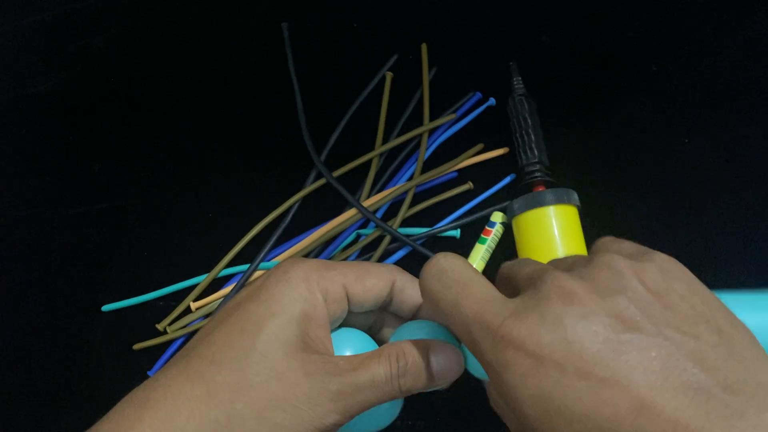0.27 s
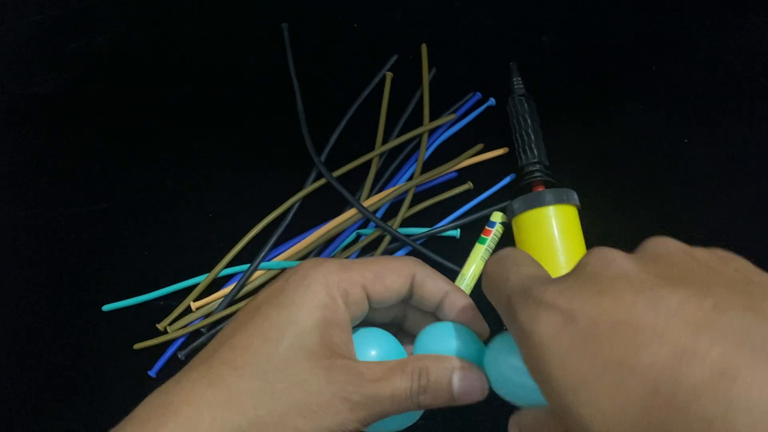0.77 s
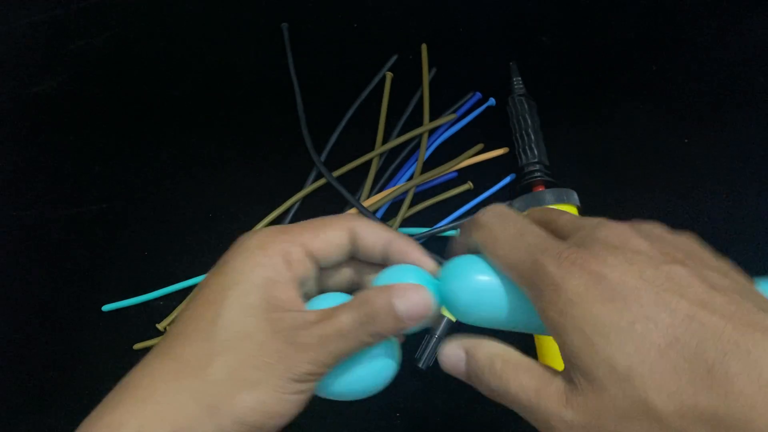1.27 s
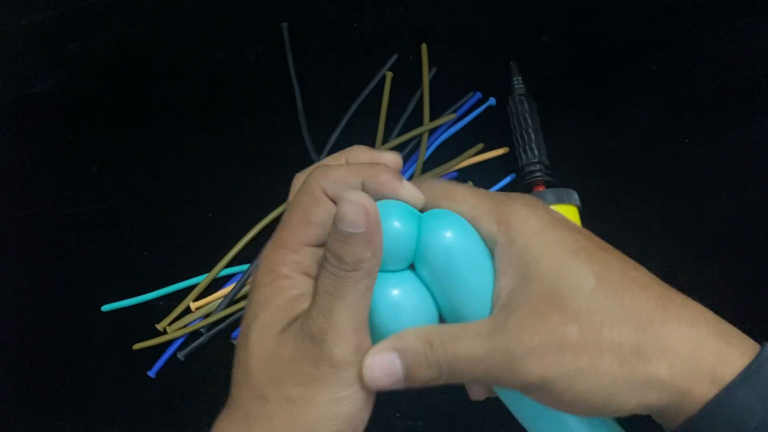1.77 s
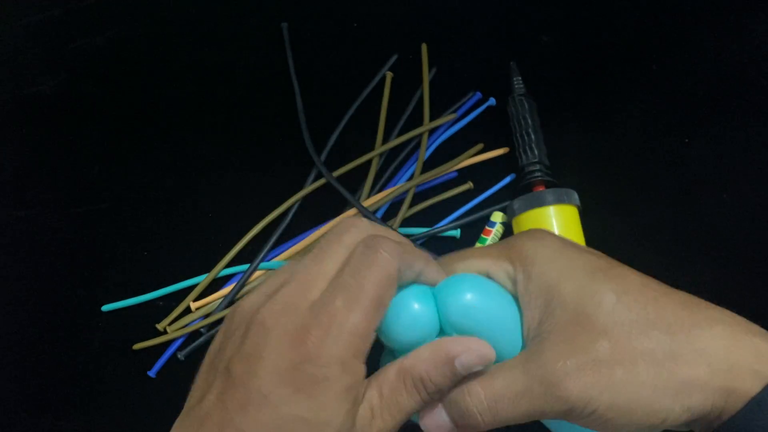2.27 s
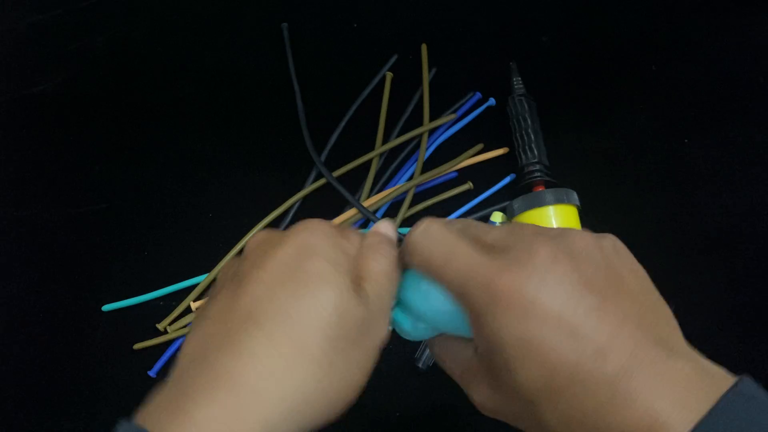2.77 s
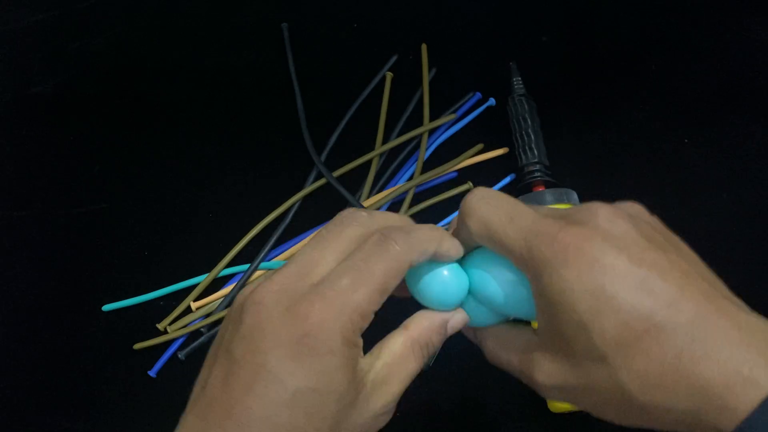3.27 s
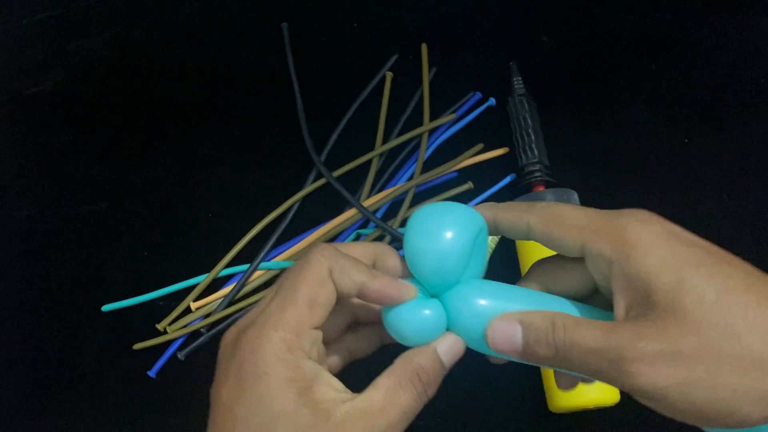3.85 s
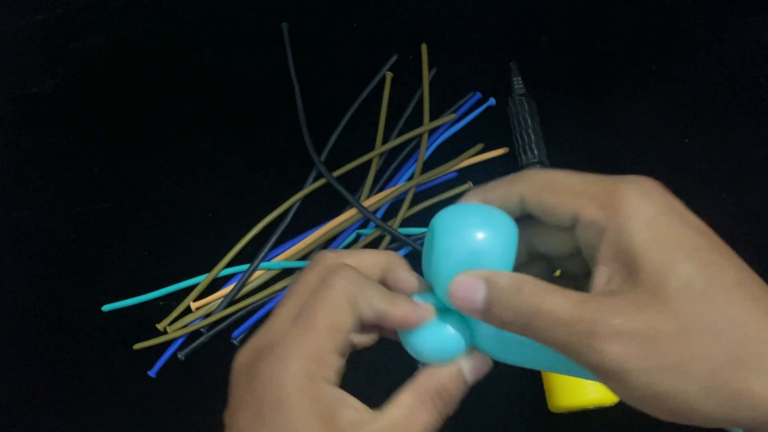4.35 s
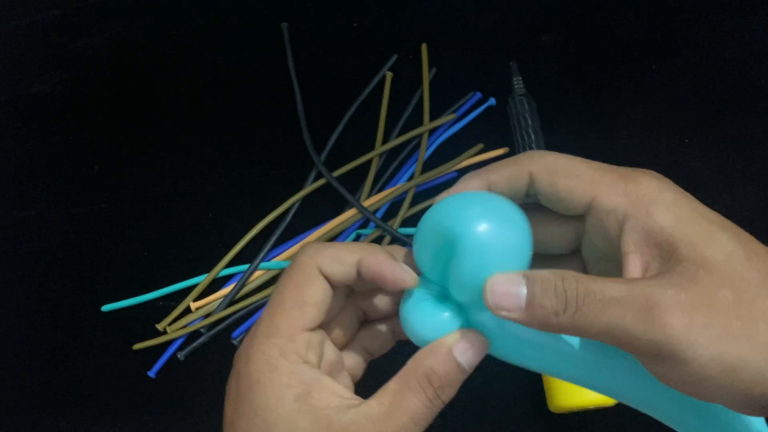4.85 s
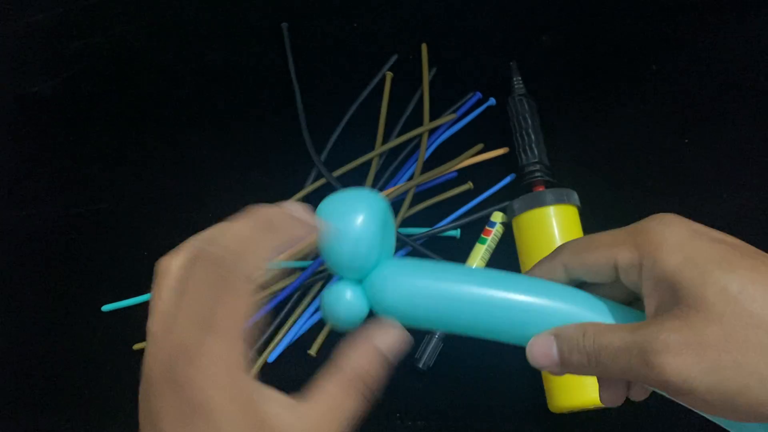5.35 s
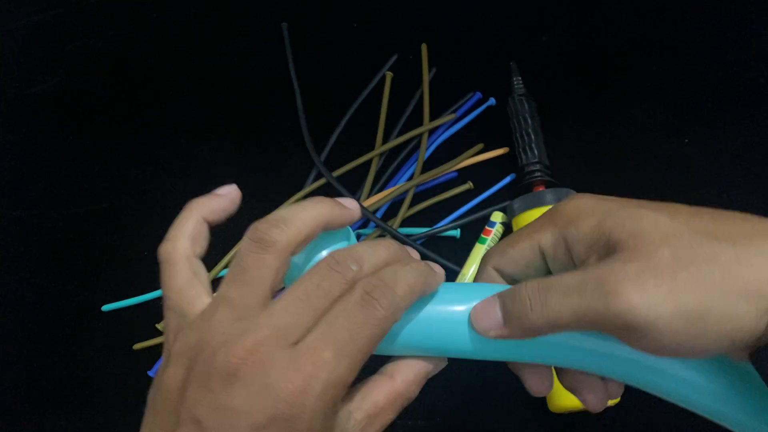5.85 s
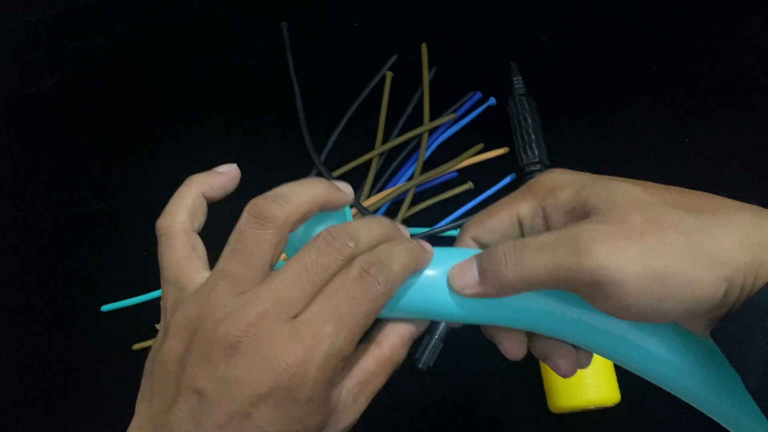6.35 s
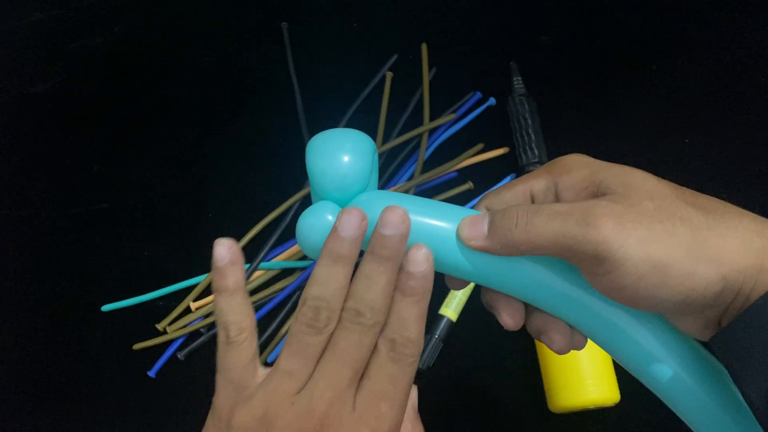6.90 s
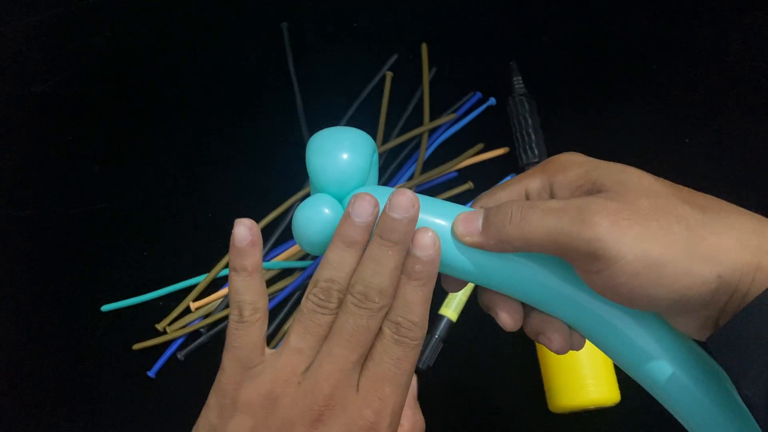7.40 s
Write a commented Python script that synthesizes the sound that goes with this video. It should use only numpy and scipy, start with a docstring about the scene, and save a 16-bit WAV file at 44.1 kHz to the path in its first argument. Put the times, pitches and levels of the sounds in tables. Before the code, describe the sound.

Fingers rustle on a long inflated latex balloon, which creaks softly at first. The rubber then sticks and slips harder as it is twisted and folded, giving uneven spells of sharp squeaky snaps, with hollow bloops, small plops and soft thuds in between. The handling fades near the end, leaving one last slip and plop. The sound is close to the microphone, in a small room with a faint low hum.

```python
"""Hands twist and fold a long latex balloon near a two-port microphone, over a small room's air and hum.
First, fingers rustle on the latex and it creaks softly. From 0.9 s the rubber sticks and slips harder:
each slip cracks, rings the skin and sends a falling wave along the tube, the loudest at 2.4 s.
Tube bloops, bubble plops, hand swishes and soft thuds come in between. After 6.4 s the handling
fades; a last slip and plop sound at 7.5 s."""
import sys
import numpy as np
from scipy import signal
from scipy.fft import rfft, irfft
from scipy.io import wavfile
from scipy.ndimage import uniform_filter1d

SR = 44100
rng = np.random.default_rng(int(sys.argv[2]) if len(sys.argv) > 2 else 0)


def unload_wav(signal):
    """Save mono or channel-first audio to the path in sys.argv[1] as 16-bit WAV at rate SR, clipped to [-1, 1]."""
    wavfile.write(
        sys.argv[1],
        SR,
        np.round(np.clip(np.atleast_2d(signal).T, -1, 1) * 32767).astype(np.int16),
    )


N = 336483

# Room air spectrum. Each row: frequency in Hz, relative density in dB.
AIR_SPECTRUM = [(18, -30.5), (30, -2.5), (54, -12), (65, -17), (123, -22), (196, -27.5), (288, -29),
                (413, -32.5), (1530, -56.5), (14000, -91.5)]
# Hum lines. Each row: frequency in Hz, rms level in dB, wander in Hz.
HUM_LINES = [(43.2, -54, 2.3), (71.4, -61.5, 2.9), (301, -73.5, 18)]
# Room decay. Each row: frequency in Hz, T60 in seconds.
ROOM_DECAY = [(200, 0.45), (1000, 0.036), (4000, 0.17), (12000, 0.079)]
# Room tail colour. Each row: frequency in Hz, relative gain in dB.
ROOM_SPECTRUM = [(200, -6), (1000, 2.5), (3000, -2), (10000, -6)]
# Port colour difference. Each row: frequency in Hz, left minus right in dB.
PORT_BALANCE = [(250, 1.5), (600, 3.5), (1500, 1), (3000, -2.5), (8000, -1)]
# Soft hand thuds. Each row: start in seconds, level in dB, centre in Hz, length in seconds.
HAND_THUDS = [(1.64, -42, 170, .035), (4.53, -46, 200, .05), (5.47, -50, 260, .06), (6.59, -50, 290, .07)]
# Hand strokes; narrow ones squeak. Each row: start and length in seconds, level in dB, band edges in Hz.
HAND_STROKES = [(0.767, 0.02, -48, 1500, 7000), (0.812, 0.13, -50, 1050, 1330),
                (1.51, 0.096, -46.5, 4006, 9200), (2.341, 0.022, -43.5, 1003, 9050),
                (2.588, 0.061, -49, 1070, 1272), (2.902, 0.024, -46, 1200, 5960),
                (4.348, 0.092, -53, 2080, 2904), (4.853, 0.44, -51.5, 3990, 11050),
                (6.137, 0.047, -53.5, 2000, 9080), (6.459, 0.34, -65, 4517, 12350),
                (6.995, 0.11, -69, 1978, 10100)]
# Steady finger sliding. Each row: time in seconds, level in dB.
SLIDE_LEVELS = [(0.0, -52.5), (0.108, -68.5), (0.148, -50), (0.34, -58), (0.36, -46), (0.51, -52),
                (0.54, -56.5), (0.81, -50), (1.2, -48), (1.311, -57.5), (1.36, -45), (1.6, -50),
                (1.94, -60.5), (2.211, -61), (2.34, -56.5), (2.901, -50), (3.168, -66), (3.299, -66),
                (3.5, -54.5), (3.9, -54.5), (4.49, -53.5), (4.55, -57.5), (5.201, -51.5), (5.42, -57),
                (5.501, -72.5), (5.7, -47.5), (5.932, -71), (6.1, -52), (6.391, -66), (6.55, -63.5),
                (6.7, -79), (6.94, -73.5), (7.3, -88), (7.63, -76.5)]
# Finger hiss spectrum. Each row: frequency in Hz, relative density in dB.
RUSTLE_SPECTRUM = [(300, 5), (1000, -4), (2300, -1.5), (4000, -1.5), (6500, -7.5), (10000, -8.5),
                   (12000, -13), (13500, -36)]
# Modes of the stretched skin. Each row: frequency in Hz, relative level in dB, T60 in seconds.
SKIN_MODES = [(1126, -9.5, 0.016), (1570, -7.5, 0.0039), (1950, -7.5, 0.022), (2681, -7.5, 0.018),
              (4372, 6.5, 0.0047)]
# Hollow tube waves. Each row: start in seconds, level in dB, end pitch in Hz, decay in cycles.
TUBE_BLOOPS = [(0.049, -39.5, 119, 0.67), (1.354, -41.5, 168, 2.1), (1.562, -38, 293, 3.9),
               (1.576, -35.5, 120, 1.2), (1.621, -26, 273.5, 1.9), (1.697, -37.5, 164, 1.8),
               (1.975, -26.5, 428, 1.7), (2.362, -29, 182.7, 0.98), (2.709, -37.5, 135, 1.9),
               (2.75, -36.5, 142.5, 1.48), (3.572, -27.5, 394, 6.8), (3.586, -21.5, 292, 1.15),
               (3.592, -33, 149.9, 1.5), (3.756, -39, 299, 1.9), (4.132, -29, 313.7, 2.8),
               (4.175, -32.5, 278, 3), (5.266, -33, 198, 3.8), (6.226, -37.5, 321, 1)]
# Twisted-off bubble. Each row: start in seconds, level in dB, pitch in Hz, decay in cycles.
BUBBLE_PLOPS = [(.648, -40, 714, 8.1), (.678, -28, 730, 3.3), (1.019, -29.5, 764, 4.4),
                (1.878, -15.5, 925, 0.78), (5.016, -20, 798, 1.82), (5.067, -31.5, 644, 2.8),
                (5.072, -25.5, 675, 1.7), (6.295, -26, 1047, 1.9), (6.429, -20, 999, 1.7),
                (7.493, -26.5, 1106, 2.6)]
# Runs of slips. Each row: start and end in seconds, first and last rate in slips per second,
# body peak in dB, main ring in Hz, crack in dB over the body peak.
CREAK_RUNS = [(0.13, .175, 76.4, 63, -37.5, 2300, -3), (0.35, .376, 290, 110, -24.5, 1600, -5),
              (.39, .4, 111, 132, -34, 2720, 3), (.412, .442, 220, 140, -33, 4050, -4.5),
              (.4725, .51, 137, 140, -30.5, 3936, -4), (.491, .512, 48.4, 56, -34, 1950, -13),
              (.9302, 0.955, 197, 205, -20, 1140, -9), (1.055, 1.074, 177, 170, -28, 1050, -20),
              (1.376, 1.388, 92, 100, -25.5, 3950, -13), (2.12, 2.136, 486, 450, -37, 3300, -16),
              (2.9445, 2.984, 98, 175, -24.5, 2070, 4), (3.9366, 3.969, 183, 200, -25, 2720, -7),
              (4.39, 4.411, 112, 128, -31.5, 2230, -0.5)]
# Single slips. Each row: start in seconds, body peak in dB, main ring in Hz, crack in dB over that peak.
SINGLE_SLIPS = [(0.026, -34.5, 2540, 10.5), (0.563, -36.5, 4500, 0), (0.5809, -27, 960, -8),
                (0.6799, -32.5, 1970, -6), (0.7317, -34, 1120, -19), (0.8933, -15.5, 1200, -6.5),
                (1.002, -29, 2497, -18), (1.0154, -17.5, 880, -20), (1.0598, -26, 1510, -20),
                (1.0812, -30, 767, -18), (1.1414, -29, 1826, -10), (1.2692, -27, 865, -11),
                (1.3435, -22, 2460, -10), (1.3983, -20, 1540, -15), (1.4151, -27.5, 3690, -2),
                (1.4331, -8, 2590, -10), (1.5605, -24.5, 728, -25), (1.571, -26, 880, -18),
                (1.577, -30, 484, -32), (1.6207, -25, 716, -21), (1.6397, -20.5, 977, -12),
                (1.6878, -32.5, 896, -20), (1.6968, -29, 754, -12), (1.8162, -35.5, 560, -25),
                (1.843, -36, 600, -3), (1.8773, -20.5, 854, -31), (1.9406, -20.5, 870, -5.5),
                (1.9643, -19, 765, -33), (1.9734, -9, 541, -40), (2.3622, -21.5, 553, -12),
                (2.3974, -2.5, 1014, -3), (2.4711, -28.5, 1050, -15), (2.55, -39, 1580, -26.5),
                (2.6102, -25.5, 1187, -5), (2.709, -33, 560, -17), (2.799, -20, 3840, -5),
                (2.8118, -24.5, 3564, -26), (3.002, -26, 2000, -17), (3.0117, -13, 2274, -7),
                (3.0235, -8, 2035, -3), (3.0272, -8.5, 1760, -27), (3.0288, -14, 1290, -25),
                (3.2109, -24.5, 3800, -7.5), (3.3103, -38, 1920, -6), (3.398, -39.5, 765, -29),
                (3.427, -44.5, 4500, 7), (3.4416, -36, 1450, -7), (3.5509, -31, 620, -13),
                (3.5648, -17.5, 1560, -24), (3.5705, -14, 2590, -6.5), (3.5735, -14, 654, -27),
                (3.5869, -6.5, 2560, -7.5), (3.8389, -30.5, 876, -17), (3.9184, -17, 2280, -13),
                (4.0225, -6.5, 3780, -1.5), (4.0595, -22, 2280, -4), (4.0705, -18, 2040, -21),
                (4.0795, -28, 1520, -7), (4.0831, -9, 930, -20), (4.0929, -29, 2000, 8),
                (4.1313, -13, 2080, -9), (4.1741, -32, 557, -15), (4.5135, -28, 2210, -34),
                (4.5226, -29.5, 2220, -3.5), (4.6763, -12, 1515, -12), (4.6846, -21.5, 2470, -6),
                (4.73, -22.5, 2110, -14), (4.7977, -15.5, 2220, -1.5), (4.9436, -15, 1850, -14),
                (5.0153, -12, 1940, -1), (5.2459, -24, 1760, 2), (5.2649, -18.5, 1190, -2.5),
                (5.3372, -26.5, 2100, -4.5), (5.3652, -26, 2210, -2.5), (5.4146, -29.5, 2300, -7.5),
                (5.5681, -32, 630, -41.5), (5.6031, -31.5, 2030, -4), (5.6234, -28.5, 1140, -19),
                (5.6569, -9.5, 1444, -6.5), (5.8597, -28.5, 983, -11), (5.9525, -35.5, 2150, -20),
                (6.0073, -29.5, 3390, -16), (6.0265, -19, 2240, -2), (6.0372, -14.5, 2260, -38),
                (6.0792, -21.5, 3020, -11), (6.0939, -28.5, 1200, -0.5), (6.1429, -32, 1960, -11),
                (6.2941, -14.5, 980, -9.5), (6.4287, -17.5, 1024, -15.5), (7.0404, -38.5, 955, -0.5),
                (7.4837, -35.5, 2667, -18.5), (7.4925, -23, 1021, -19)]


def undb(db):
    """dB to amplitude."""
    return 10 ** (np.asarray(db) / 20)


def unit(x):
    """Scale to rms 1."""
    return x / np.sqrt(np.mean(x ** 2))


def peak(x):
    """Scale each row to peak 1."""
    return x / np.abs(x).max(axis=-1, keepdims=True)


def columns(table):
    """Split into column vectors."""
    return np.transpose(table)[:, :, None]


def on_log(table, hz):
    """Read a (Hz, value) table on a log-frequency axis."""
    points_hz, values = np.transpose(table)
    return np.interp(np.log(np.maximum(hz, 1)), np.log(points_hz), values)


def coloured(x, table):
    """Filter by (Hz, dB) points."""
    n = x.shape[-1]
    return irfft(rfft(x) * undb(on_log(table, np.arange(n // 2 + 1) * SR / n)), n)


def bandpass(x, low_hz, high_hz):
    """Butterworth band-pass."""
    return signal.sosfilt(signal.butter(2, [low_hz, high_hz], "band", fs=SR, output="sos"), x)


def highpass(x, hz, order=2):
    """Butterworth high-pass."""
    return signal.sosfilt(signal.butter(order, hz, "high", fs=SR, output="sos"), x)


def walk(rate_hz):
    """Random steps, smoothed twice; rms 1."""
    hold = int(SR / rate_hz)
    steps = np.repeat(rng.standard_normal(N // hold + 1), hold)
    return unit(uniform_filter1d(uniform_filter1d(steps, hold), hold)[:N])


def sine(hz):
    """Sine following a pitch track."""
    return np.sin(2 * np.pi * np.cumsum(hz) / SR)


def place(rows, starts_s):
    """Sum short sounds at their start times."""
    out = np.zeros(N + rows.shape[1])
    for row, at in zip(rows, (starts_s * SR).astype(int).ravel()):
        out[at:at + len(row)] += row
    return out[:N]


def background(air_db=-55.5):
    """Room air, its bass common to both ports, plus wavering hum lines."""
    shared = coloured(rng.standard_normal(N), AIR_SPECTRUM)
    own = coloured(rng.standard_normal((2, N)), AIR_SPECTRUM)
    apart = signal.sosfiltfilt(signal.butter(2, 400, "high", fs=SR, output="sos"), own - shared)
    air = unit(highpass(shared + apart, 55, order=4))
    hum = sum(np.sqrt(2) * undb(db + walk(13)) * sine(hz + wander_hz * walk(10))
              for hz, db, wander_hz in HUM_LINES)
    return undb(air_db + 3 * walk(5)) * air + hum


def room(x, level_db=-20, gap_s=0.013):
    """Reverberation: a noise tail with one decay per octave; the ports share the bass."""
    t = np.arange(SR // 2) / SR
    tail = 0
    for hz in 150 * 2 ** np.arange(7):
        shared, *own = rng.standard_normal((3, len(t)))
        apart = min(hz / 2500, .9)
        band = bandpass(shared + apart * np.array(own), hz / 2 ** .5, hz * 2 ** .5)
        decay = np.exp(-np.log(1000) * t / on_log(ROOM_DECAY, hz))
        tail = tail + undb(on_log(ROOM_SPECTRUM, hz)) * band * decay
    tail = tail * (1 - np.exp(-(t / gap_s) ** 3))  # gap before the nearest walls answer
    return undb(level_db) * signal.fftconvolve(x[None], unit(tail) / np.sqrt(len(t)), axes=1)[:, :N]


def ports(x, lag_s=.000036, cavity_hz=4820, width_hz=400):
    """The ports differ in colour; the right one lags, and a cavity behind it turns the phase."""
    hz = np.arange(N // 2 + 1) * SR / N
    turn_rad = 2 * np.arctan2(width_hz * hz, cavity_hz ** 2 - hz ** 2)
    tilt = undb(on_log(PORT_BALANCE, hz) / 2)
    right = np.exp(-1j * (2 * np.pi * hz * lag_s + turn_rad)) / tilt
    return irfft(rfft(x) * [tilt, right], N)


def tube_echo(x, delay_s=0.019, centre_hz=1134, level_db=-15):
    """Each snap returns from the tube's far end as a narrow blip."""
    blip = signal.lfilter(*signal.iirpeak(centre_hz, Q=7, fs=SR), x)
    return undb(level_db) * np.pad(blip, ((0, 0), (int(delay_s * SR), 0)))[:, :N]


def thuds():
    """Hand thuds: dull noise, strongest at half its length."""
    t = np.arange(12000) / SR
    rows = []
    for _, db, hz, length_s in HAND_THUDS:
        noise = unit(bandpass(rng.standard_normal(len(t)), hz / 1.63, hz * 1.26))
        age = 2 * t / length_s
        rows.append(undb(db) * noise * age * np.exp(1 - age))
    return place(np.array(rows), np.array(HAND_THUDS)[:, 0])


def swishes():
    """Hand strokes along the latex: a band of hiss swells and fades."""
    t = np.arange(SR // 2) / SR
    rows = []
    for _, length_s, db, low_hz, high_hz in HAND_STROKES:
        swell = np.sqrt(np.sin(np.pi * (t / length_s).clip(0, 1)).clip(0))
        rows.append(undb(db) * swell * unit(bandpass(rng.standard_normal(len(t)), low_hz, high_hz)))
    return place(np.array(rows), np.array(HAND_STROKES)[:, 0])


def rubbing_db(table, drag_db=-31, drag_db_per_slip_db=1.85, fade_db_per_s=129):
    """Finger friction level: steady sliding plus a fading drag after each slip, summed as power."""
    kicks = place(undb(2 * (drag_db + drag_db_per_slip_db * table[:, [1]])), table[:, 0])
    drag_power = signal.lfilter([1], [1, -undb(-2 * fade_db_per_s / SR)], kicks)
    slide_db = np.interp(np.arange(N) / SR, *np.transpose(SLIDE_LEVELS))
    return 10 * np.log10(undb(2 * slide_db) + drag_power)


def rustle(rub_db):
    """Fingers drag on latex: spurts of gritty hiss and skin rings; colour and pitch drift with the grip."""
    flutter_db = 2.6 * walk(400) + 1.8 * walk(120) + 2.2 * walk(20)
    shared, *own = rng.standard_normal((3, N))
    hiss = (shared + 0.48 * np.array(own)) * undb(flutter_db)
    spectrum = rfft(coloured(hiss, RUSTLE_SPECTRUM))
    hz = np.arange(N // 2 + 1) * SR / N
    rings = sum(walk(280) * undb(4.5 * walk(18)) * sine(mode_hz * (1 + .07 * walk(3)))
                for mode_hz, _, _ in SKIN_MODES)
    octaves = 0
    for centre_hz in 300 * 2 ** np.arange(7):
        window = np.exp(-2 * np.log2((hz + 1) / centre_hz) ** 2)
        octaves = octaves + irfft(spectrum * window, N) * undb(2.5 * walk(9))
    return unit(unit(octaves) + 0.28 * unit(rings)) * undb(rub_db)


def skin_wave(t, hz, decay_cycles, rise_cycles, glide=0, glide_s=1):
    """The fast high part arrives first: pitch falls from (1 + glide) * hz to hz."""
    phase = 2 * np.pi * hz * (t + glide * glide_s * (1 - np.exp(-t / glide_s)))
    return np.sin(phase) * np.exp(-t * hz / decay_cycles) * (1 - np.exp(-t * hz / rise_cycles)) ** 2


def bloops():
    """Slow waves along the tube: a steep pitch fall to a low, uneven ring."""
    start_s, db, hz, cycles = columns(TUBE_BLOOPS)
    t = np.arange(6000) / SR
    ring = skin_wave(t, hz, cycles.clip(.8, 12), rise_cycles=0.52, glide=4.3, glide_s=0.0024)
    return place(undb(db) * peak(ring), start_s) * undb(3.5 * walk(300))


def plops():
    """The air of a small bubble rings unevenly at one pitch."""
    start_s, db, hz, cycles = columns(BUBBLE_PLOPS)
    ring = skin_wave(np.arange(3000) / SR, hz, cycles, rise_cycles=0.67)
    return place(undb(db) * peak(ring), start_s) * undb(2.5 * walk(400))


def tick_rows(rub_db, count=170):
    """Faint slips at random times, level tied to the rubbing."""
    when, strength, pitch, crack = rng.random((count, 4)).T
    start_s = when * (N - 1) / SR
    db = rub_db[(start_s * SR).astype(int)] + 9 - 1.2 * np.log(strength)
    return np.column_stack([start_s, db, 1200 * 3 ** pitch, -14 + 12 * crack])


def creak_rows(gap_spread=.035, scatter_db=1.7, pitch_spread=0.065):
    """Creaks as uneven runs of slips that speed up or slow down; returns slip rows and their contacts."""
    rows, contacts = [], []
    for contact, (start_s, end_s, first_per_s, last_per_s, db, hz, crack_db) in enumerate(CREAK_RUNS):
        gap, level, pitch = rng.standard_normal((40, 3)).T
        at_s, i = start_s, 0
        while at_s < end_s:
            rows.append((at_s, db + scatter_db * level[i], hz * (1 + pitch_spread * pitch[i]), crack_db))
            contacts.append(contact)
            i += 1
            at_s += (1 + gap_spread * gap[i]) / np.interp(at_s, [start_s, end_s], [first_per_s, last_per_s])
    return np.array(rows), np.array(contacts)


def skin_ring(t, scatter, rise_s=.0004):
    """Decaying skin modes, scattered in level and pitch per slip."""
    modes = 0
    for k, (hz, db, t60_s) in enumerate(SKIN_MODES):
        envelope = undb(db + 2.5 * scatter[:, [2 * k]]) * np.exp(-np.log(1000) * t / t60_s)
        detuned_hz = hz * (1 + 0.077 * scatter[:, [2 * k + 1]])
        modes = modes + envelope * np.sin(2 * np.pi * detuned_hz * t)
    return modes * (1 - np.exp(-t / rise_s)) ** 2


def scrape(t, grit, decay_s, tail_gain, tail_s=0.007, rise_s=0.0006):
    """The tearing contact: a noise burst that scrapes on briefly."""
    decay = np.exp(-t / decay_s) + tail_gain * np.exp(-t / tail_s)
    return grit * decay * (1 - np.exp(-t / rise_s)) ** 2


def slips(table, contacts=None, ring_scale=1, alike=.9):
    """Stick-slip: a bright crack, then a falling wave and skin modes; slips of one contact sound alike."""
    start_s, db, hz, crack_db = columns(table)
    t = np.arange(1500) / SR
    draws = rng.standard_normal((len(start_s), len(t) + 2 * len(SKIN_MODES) + 1))
    if contacts is not None:
        draws = alike * draws[contacts] + np.sqrt(1 - alike ** 2) * draws
    grit, scatter = draws[:, :len(t)], draws[:, len(t):]
    crack = bandpass(scrape(t, grit, decay_s=.0006, tail_gain=.09), 4500, 11500)
    rasp = bandpass(scrape(t, grit, decay_s=.0009, tail_gain=.14), 700, 4400)
    cycles = ring_scale * (0.5 + 0.4 * hz / 1000 - 0.05 * db)  # the grip chokes hard slips
    wave = skin_wave(t, hz, cycles.clip(.8, 12), rise_cycles=0.55, glide=1.4, glide_s=0.7 / hz)
    shudder = 1 + 2.8 * uniform_filter1d(grit, size=30)
    body = peak(highpass(wave * shudder, 320)) + 0.55 * peak(skin_ring(t, scatter)) + 0.7 * peak(rasp)
    rows = peak(body) + undb(crack_db) * peak(crack)
    pan_db = 1.5 * scatter[:, [-1]]
    return np.array([place(undb(db + side * pan_db) * rows, start_s) for side in (1, -1)])


def scene():
    """Balloon near, room and hum behind."""
    creaks, contacts = creak_rows()
    rub_db = rubbing_db(np.vstack([SINGLE_SLIPS, creaks]))
    near = slips(np.vstack([SINGLE_SLIPS, tick_rows(rub_db)])) + slips(creaks, contacts, ring_scale=0.65)
    near = near + bloops() + plops() + thuds() + rustle(rub_db) + swishes()
    near = near + tube_echo(near)
    return ports(near + room(near.mean(axis=0))) + background()


def record(dry, low_hz=36, top_hz=16600):
    """The recorder cuts the deepest bass and the top."""
    lowpass = signal.ellip(12, .2, 80, top_hz, fs=SR, output="sos")
    return signal.sosfilt(lowpass, highpass(dry, low_hz, order=6))


dry = scene()
out = record(dry)
unload_wav(out)
```